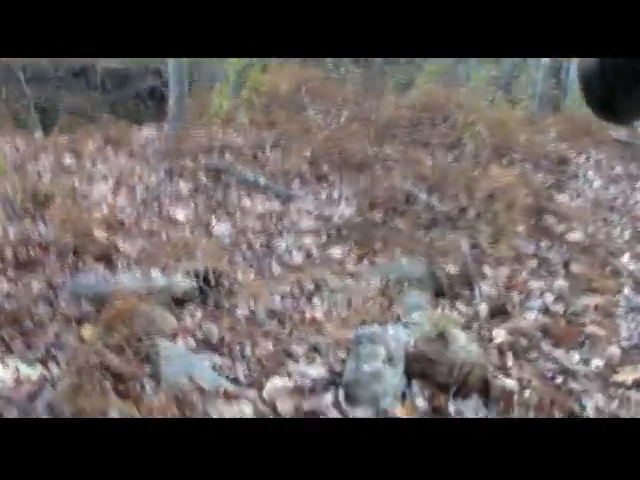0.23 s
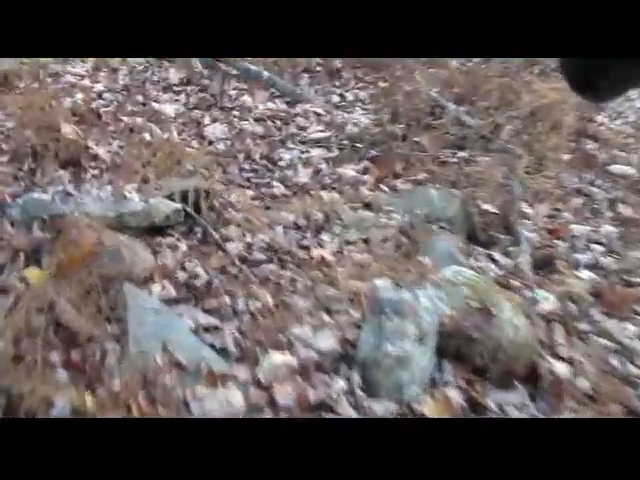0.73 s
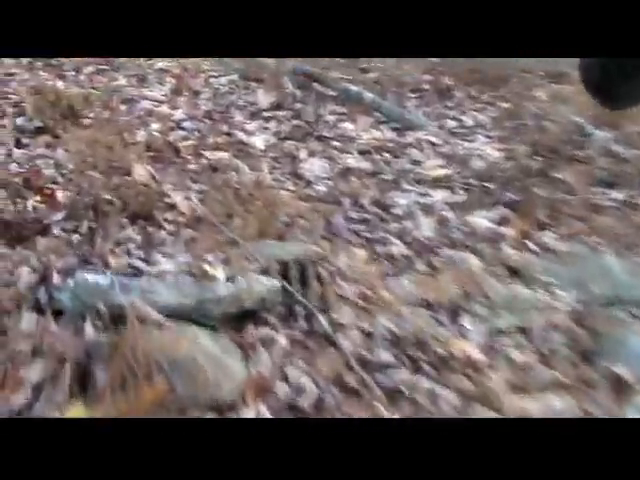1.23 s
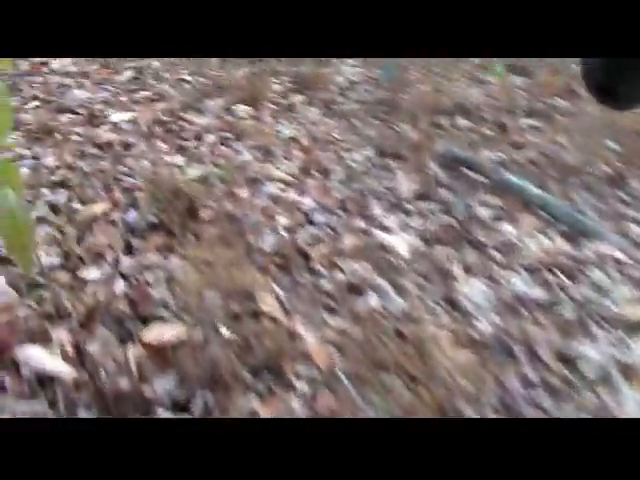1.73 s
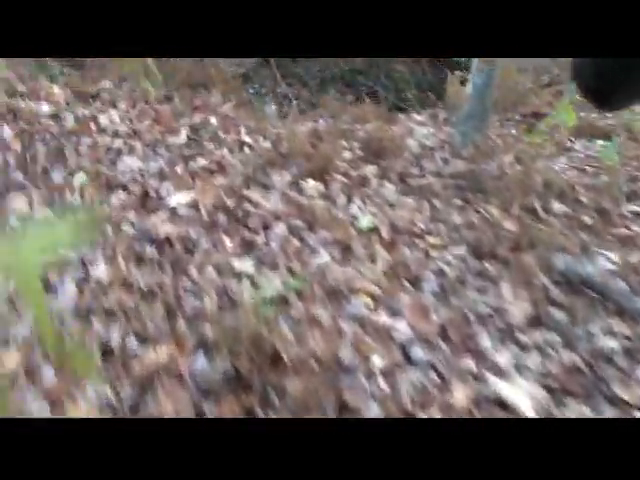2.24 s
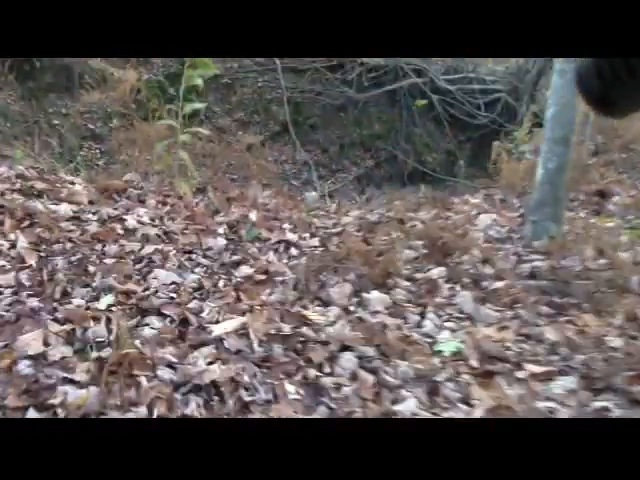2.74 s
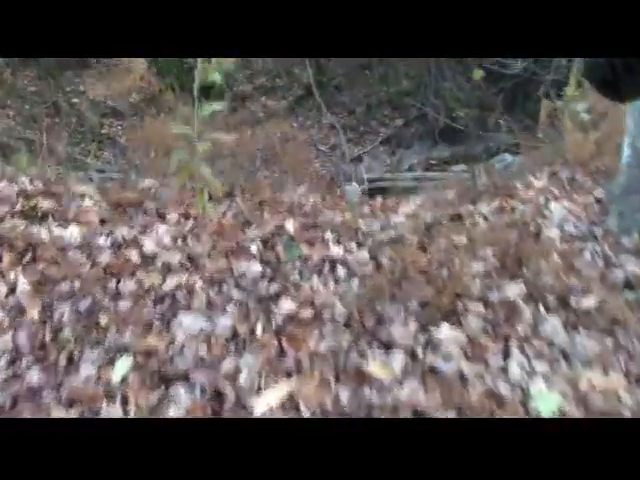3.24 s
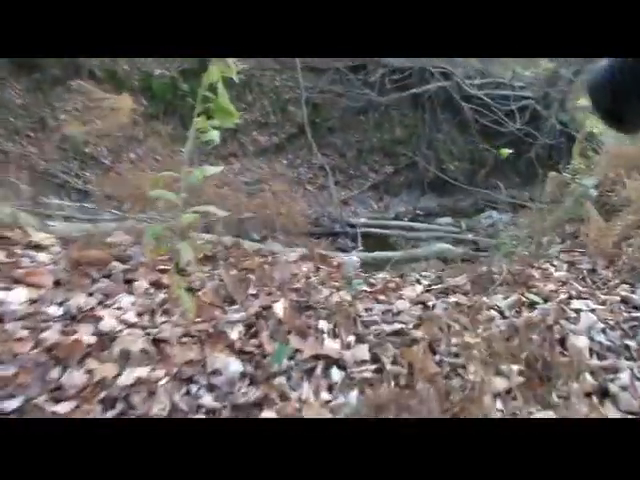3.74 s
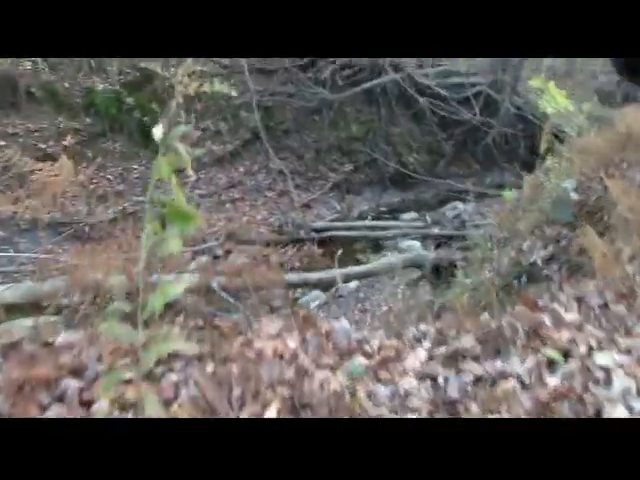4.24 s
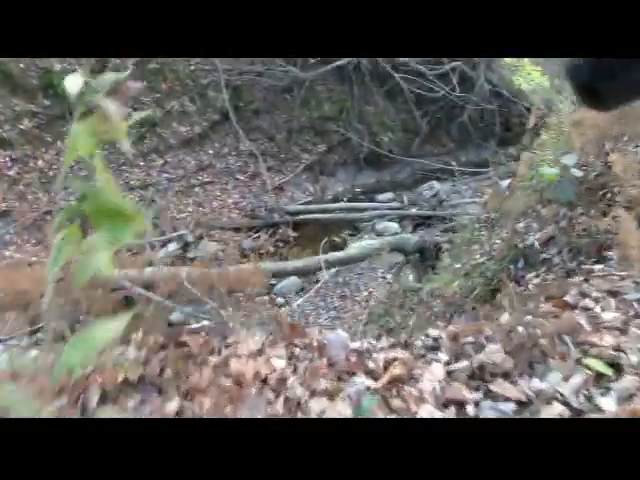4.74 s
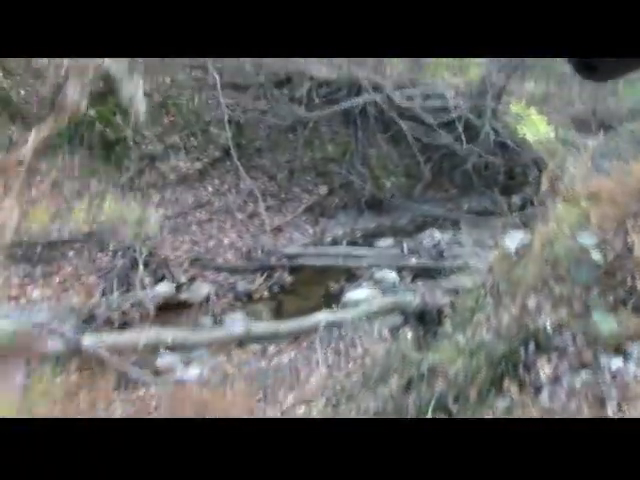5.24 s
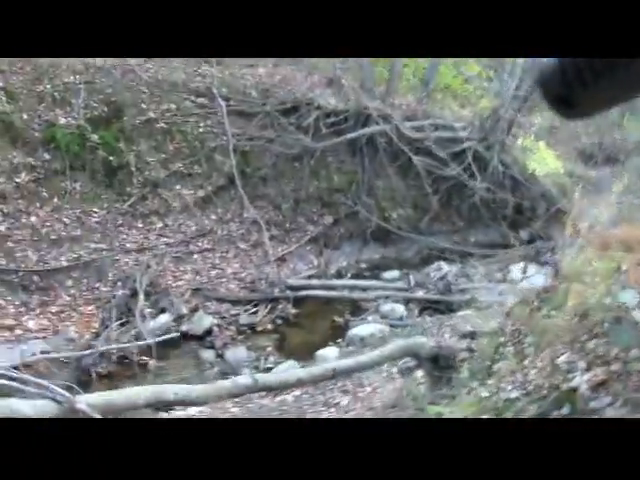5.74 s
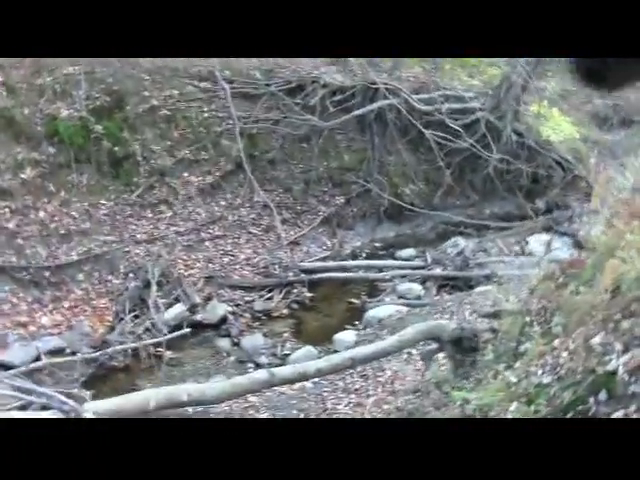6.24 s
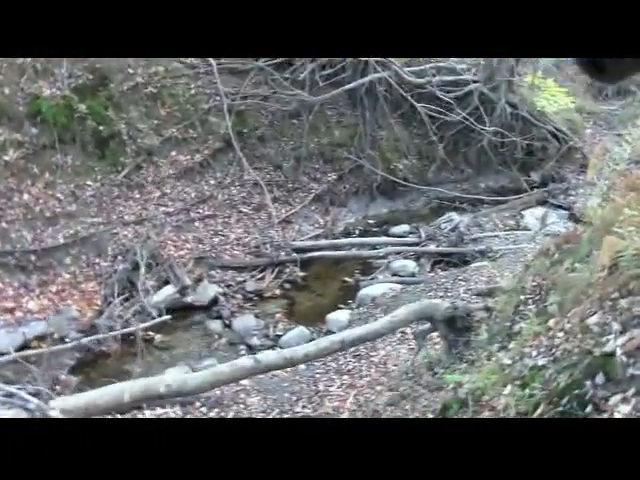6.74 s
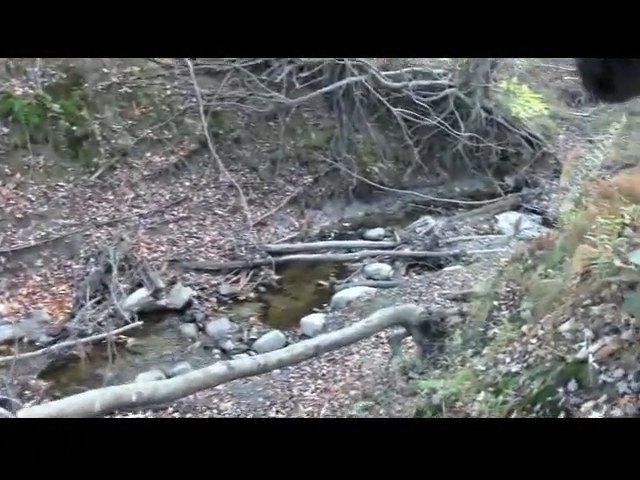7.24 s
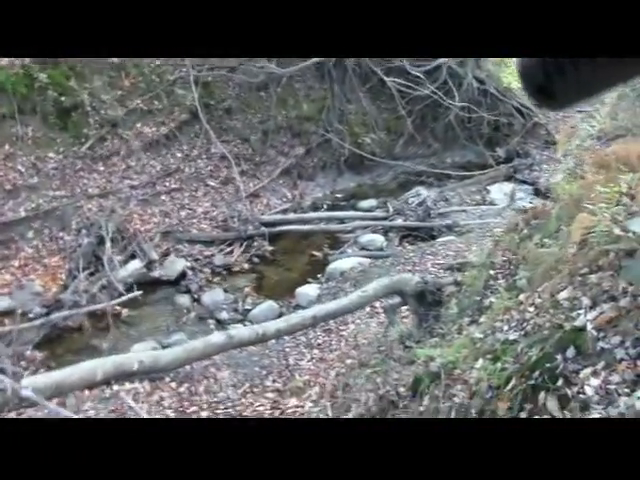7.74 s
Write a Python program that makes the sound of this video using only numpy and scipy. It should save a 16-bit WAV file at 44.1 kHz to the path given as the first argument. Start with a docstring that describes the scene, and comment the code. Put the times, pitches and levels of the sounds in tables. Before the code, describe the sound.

Someone walks unhurriedly through thick dry leaf litter, each step a dense crackling crunch, then stops, leaving faint water wash and small leaf ticks.

```python
"""A dry tick and a brush of leaves, then slow steps through deep dry litter on a creek bank until walking stops.
Each foot crushes the leaves: a dense random shower of short fractures, shaped by pressure and coloured by filters.
Bent leaves flick back as sparse bright ticks, stems snap singly, and decaying sines make a few soft knocks.
A thin tail of decaying noise answers from the wood, and filtered noise makes the creek's wash.
Apart from the creek, four sines make a faint steady hum."""
import sys
import numpy as np
from scipy import signal
from scipy.fft import rfft, irfft
from scipy.io import wavfile
from scipy.ndimage import uniform_filter1d

SR = 44100
rng = np.random.default_rng(int(sys.argv[2]) if len(sys.argv) > 2 else 0)


def materialize(psi):
    """Save the field psi as 16-bit PCM at rate SR to the path in sys.argv[1].

    A 1-D psi becomes a single channel; in a 2-D psi each row is a channel.
    """
    bounded = np.clip(np.atleast_2d(psi).T, -1, 1)
    quanta = np.round(bounded * 32767).astype(np.int16)
    wavfile.write(sys.argv[1], SR, quanta)


N = 352359
TIME = np.arange(N) / SR

# Colour of cracking leaves: f/Hz, relative spectral level/dB per Hz
LEAF = [(30, -43), (150, -42.5), (250, -28.5), (480, -13), (1200, -6), (2000, -5), (2900, -2), (3900, -5.5),
        (5600, 0.5), (8000, -7), (9600, -5.5), (11300, -11.5), (14000, -14), (15700, -22.5)]
# Footfalls, left foot first: t at full weight/s, rise/(dB/s), hold/s, relative level/dB, fade/(dB/s),
# time from full weight until the foot lifts/s, hollow body offset/dB, crisp edge offset/dB
STEPS = [(0.241, 128, 0.062, -14, 68, 0.39, -0.6, -.5), (0.994, 300, 0.22, -16, 89, 0.45, 0.5, -0.4),
         (1.756, 301, 0.059, -14.5, 53, 0.7, -4.5, -2), (2.633, 286, 0.19, -18.5, 64, .52, -0.5, -2.5),
         (3.486, 181.5, 0.23, -18, 49.5, 0.76, -1, 0), (4.401, 479, 0.34, -17, 84, 0.6, -0.5, -3),
         (5.281, 270, 0.2, -17, 66.5, 0.56, -3, -0.5), (6.133, 427, 0.037, -16.5, 32.5, 0.5, 0, -1.5),
         (6.846, 90, 0.066, -15.5, 347.5, 0.097, -1.5, 1)]
SWING_S = 0.196  # a foot takes over this long before it bears full weight


def gain_of(db):
    """Level definition: decibels to amplitude ratio."""
    return 10 ** (np.asarray(db) / 20)


def evened(x):
    """Power normalisation: scales to rms 1."""
    return x / np.sqrt(np.mean(x ** 2) + 1e-20)


def read(points, hz):
    """Interpolation of a spectrum table by straight lines on a logarithmic frequency axis."""
    f, value = np.transpose(points)
    return np.interp(np.log(hz + 1), np.log(f + 1), value)


def add(mix, s, sound):
    """Superposition: mixes a stereo sound in at time s."""
    part = mix[:, max(round(s * SR), 0):][:, :sound.shape[1]]
    part += sound[:, :part.shape[1]]


def wander(corner_hz):
    """Low-passed noise: a slow random fluctuation of rms 1."""
    rolloff = 1 + (np.fft.rfftfreq(N, 1 / SR) / corner_hz) ** 2
    return evened(irfft(rfft(rng.standard_normal(N)) / rolloff, N))


def patches(shape, bins, frames):
    """Twice-smoothed noise: a random field of rms 1 over frequency bins and time frames."""
    field = rng.standard_normal(shape)
    for _ in range(2):
        field = uniform_filter1d(field, bins, axis=0)
        field = uniform_filter1d(field, frames, axis=1)
    return evened(field)


def coloured(x, spectrum, size=4096):
    """Minimum-phase filtering: a causal response of unit energy, so that cracks keep their sharp fronts."""
    log_gain = np.log(gain_of(read(spectrum, abs(np.fft.fftfreq(size, 1 / SR)))))
    # the Hilbert transform of the log gain gives the minimum phase
    response = np.exp(np.conj(signal.hilbert(log_gain)))
    taps = np.fft.ifft(response).real[:size // 2]
    return signal.oaconvolve(x, taps[None] / np.linalg.norm(taps), axes=1)[:, :x.shape[1]]


def leaves(crush_db, cracks_per_s=15000, rate_follow=.55, clump_db=1.5, level_db=0.75):
    """Granular fracture: more pressure breaks more leaves at once, and they give way in clumps."""
    toe_thinning_db = -5  # under the toe the cracks are fewer and each is larger
    swing, roll = stride()
    rate_db = rate_follow * (crush_db - crush_db.max()) + toe_thinning_db * roll
    per_s = np.minimum(cracks_per_s * gain_of(rate_db), SR)
    cracks = shower(per_s, spread_db=2.5, limit_db=17)
    cracks = cracks * gain_of(crush_db + clump_db * wander(corner_hz=14))
    body_db, edge_db = underfoot(crush_db, swing, roll)
    return gain_of(level_db) * litter_colour(coloured(cracks, LEAF), body_db, edge_db)


def crush():
    """Contact pressure as summed power in dB: steps rise, hold, fade and lift off; scuffs swell and pass."""
    # Shorter scuffs, as a toe catches, a sole rolls or a heel lifts: t/s, half length/s, relative level/dB
    scuffs = [(0.01, 0.022, -40), (0.13, 0.015, -35), (0.525, 0.038, -26.5), (0.697, 0.031, -31),
              (0.842, 0.069, -37.5), (0.906, 0.0089, -18.5), (0.922, 0.01, -27.5), (1.41, 0.027, -30.5),
              (1.66, 0.039, -31.5), (1.999, 0.033, -18.5), (2.259, 0.048, -26), (2.589, 0.0061, -21),
              (3.377, .035, -34), (3.765, 0.029, -19.5), (3.966, 0.066, -30), (4.321, 0.014, -37),
              (4.698, 0.011, -17.5), (5.177, 0.038, -39), (5.753, 0.057, -28.5), (5.905, 0.082, -34.5),
              (6.05, 0.016, -51), (6.53, .04, -27.5), (6.998, .018, -24.5), (6.7, 0.054, -28),
              (7.073, .13, -30), (7.274, 0.078, -42)]
    rest_db = -49  # the litter never lies quite still
    sag_db_per_s = 7  # the crunch eases while the foot stands on it
    lift_db_per_s = 212  # added to the fade once the foot lifts
    power = gain_of(rest_db) ** 2
    for s, rise, hold, db, fade, lift, _, _ in STEPS:
        t = TIME - s
        pressed = db + rise * np.minimum(t, 0) - sag_db_per_s * np.clip(t, 0, hold)
        eased = fade * np.maximum(t - hold, 0) + lift_db_per_s * np.maximum(t - lift, 0)
        power = power + gain_of(np.maximum(pressed - eased, -120)) ** 2
    for s, half, db in scuffs:
        swell = np.exp(-np.minimum(((TIME - s) / half) ** 2, 20))
        power = power + gain_of(db) ** 2 * swell
    return 10 * np.log10(power)


def current_step():
    """Gait timing: which footfall is under way at every sample."""
    return np.searchsorted(np.array(STEPS)[1:, 0] - SWING_S, TIME)


def stride():
    """Gait phase: swing falls from 1 to 0 as the foot comes down, then roll goes from 0 (heel) to 1 (toe)."""
    roll_s = .25  # the sole rolls from heel to toe in this time
    t = TIME - np.array(STEPS)[current_step(), 0]
    return np.clip(-t / SWING_S, 0, 1), np.clip(t / roll_s, 0, 1)


def underfoot(crush_db, swing, roll, sink_db=1.5):
    """Spectral balance under load: fuller and crisper toward the toe, hollow as the pressure eases; in dB."""
    # under light pressure the leaves bend more than they break: hollow, with less edge
    soft_below_db, hollow_per_db, dull_per_db = -29, .5, 0.13
    # the heel crunches duller than the toe; a foot in the air only brushes the crisp top leaves
    heel_edge_db, toe_edge_db, swing_edge_db = 0.5, 2, 2
    *_, body_db, edge_db = np.array(STEPS)[current_step()].T
    soft_db = np.maximum(soft_below_db - crush_db, 0)
    sole_db = heel_edge_db * (1 - swing - roll) + swing_edge_db * swing + toe_edge_db * roll
    body_db = body_db + sink_db * roll + hollow_per_db * soft_db
    return body_db, edge_db + sole_db - dull_per_db * soft_db


def crack(hz, ring_s, tear_s, ring, scatter, scatter_s, size=1024):
    """Impulsive fracture: a brief tear, a few cycles of the blade, and scatter off the leaves around it."""
    t = np.arange(size) / SR
    tear = np.exp(-t / tear_s) * rng.standard_normal(size)
    blade = np.exp(-t / ring_s) * np.sin(2 * np.pi * hz * t) * rng.choice([-1, 1])
    around = np.exp(-t / scatter_s) * rng.standard_normal(size)
    return evened(evened(tear) + ring * evened(blade) + scatter * evened(around))


def shower(per_s, spread_db, limit_db, count=48):
    """Random shot noise: cracks of many pitches and sizes at a given rate, with even mean power."""
    at = np.flatnonzero(rng.random(N) < per_s / SR)
    sizes = gain_of(np.minimum(spread_db * rng.exponential(1, N), limit_db))
    # rarer cracks are larger, which keeps the mean power even
    sizes = evened(sizes)[at] * np.sqrt(SR / per_s[at])
    kinds = rng.integers(0, count, N)[at]
    out, power = np.zeros((2, N)), 0
    for k, hz in enumerate(np.geomspace(1200, 14000, count)):
        pair = np.array([crack(hz, ring_s=0.0011, tear_s=0.00057, ring=0.5, scatter=0.79, scatter_s=0.0033)
                         for _ in out])
        impulses = np.bincount(at[kinds == k], sizes[kinds == k], N)
        out += signal.oaconvolve(impulses[None], pair, axes=1)[:, :N]
        power = power + abs(rfft(pair)) ** 2
    # taken together the cracks favour no pitch; the leaf colour is laid on afterwards
    flatten = np.fft.fftshift(irfft(power ** -.5), axes=1)
    return evened(signal.oaconvolve(out, flatten, "same", axes=1))


def litter_colour(x, body_db, edge_db, body_hz=680, body_octaves=0.89, edge_hz=7800,
                  drift_db=0.5, flutter_db=1.5, size=512):
    """Time-varying filtering: hollow body, crisp edge, and brief pitches favoured by each crumpling leaf."""
    hz, t, z = signal.stft(x, SR, nperseg=size, noverlap=3 * size // 4)
    body = np.exp(-.5 * (np.log2((hz + 1) / body_hz) / body_octaves) ** 2)
    edge = 1 - 1 / (1 + (hz / edge_hz) ** 8)
    db = np.outer(body, np.interp(t, TIME, body_db)) + np.outer(edge, np.interp(t, TIME, edge_db))
    drift = drift_db * patches(db.shape, bins=14, frames=28)
    flutter = flutter_db * patches(db.shape, bins=3, frames=6)
    z = z * gain_of(db) * evened(gain_of(drift + flutter))
    return signal.istft(z, SR, nperseg=size, noverlap=3 * size // 4)[1][:, :N]


def settling(crush_db, ticks_per_s=110, follow_crush=0.57, level_db=-21.5, bright_hz=3000):
    """Elastic recovery: bent leaves flick back in small bright ticks that stand out between the steps."""
    ticks = shower(np.full(N, ticks_per_s), spread_db=10.0, limit_db=16, count=12)
    high_pass = signal.butter(1, bright_hz, "high", fs=SR)
    ticks = signal.lfilter(*high_pass, coloured(ticks, LEAF))
    return evened(ticks) * gain_of(level_db + follow_crush * crush_db)


def snaps(level_db=0.5, delay_s=0.000986):
    """Brittle fracture: stiffer stems break with one sharp, dry tick each."""
    # The loudest stems and leaf ribs that snap singly: t before delay_s/s, relative peak level/dB, f/Hz
    stem_snaps = [(0.0176, -13, 5960), (0.0968, -16.5, 5270), (0.595, -9.5, 5700), (0.6398, -13.5, 3810),
                  (0.8998, -8, 5400), (0.9022, -6, 5500), (1.4056, -14, 5670), (1.587, -22, 9400),
                  (1.641, -4.5, 6900), (1.6948, -12.5, 5140), (1.9514, -13, 5310), (2.163, -10, 3930),
                  (2.587, -7, 2750), (2.847, -1.5, 5500), (2.889, -4, 5530), (3.2162, -13, 7100),
                  (3.254, -15.5, 5800), (3.895, -8, 5050), (4.0986, -12.5, 4440), (4.265, -22, 4500),
                  (4.311, -21, 5000), (4.38, -11, 4900), (4.89, -12.5, 4500), (4.9584, -13.5, 2320),
                  (5.0537, -11.5, 5700), (5.2018, -16, 6140), (5.235, -7, 5560), (5.344, -13, 5300),
                  (5.6925, -13, 3000), (6.2987, -2.5, 5560), (6.326, -4, 6300), (6.334, -5, 2540),
                  (6.3916, -4, 5700), (6.6244, -1.5, 4800), (7.097, -11, 6400), (7.2717, -15.5, 6600),
                  (7.4175, -19.5, 4800), (7.57, -17.5, 3470), (7.6121, -18, 5060), (7.676, -22, 5950),
                  (7.871, -18.5, 2800), (7.9123, -22, 5060)]
    # Colour of a snapping stem, broader than that of the leaves: f/Hz, relative spectral level/dB per Hz
    stem_colour = [(30, -63), (200, -38), (500, -9), (1200, -5.5), (2900, -9), (4000, -6.5), (5600, -3.5),
                   (8000, -6), (9600, -5), (15700, -18)]
    out = np.zeros((2, N))
    for s, db, hz in stem_snaps:
        pair = [crack(hz, ring_s=0.001, tear_s=0.0011, ring=0.56, scatter=0.29, scatter_s=0.0033)
                for _ in out]
        tick = coloured(np.array(pair), stem_colour)
        tick = tick / abs(tick).max(1, keepdims=True)
        add(out, s + delay_s, gain_of(db + level_db) * tick)
    return out


def knocks(swell_s=0.00098, level_db=-1, low_cut_hz=240, size=1024):
    """Heavily damped resonance: dull bumps that die within a few cycles."""
    # Soft low knocks between the steps: t/s, relative envelope peak level/dB, f/Hz
    soft_knocks = [(0.641, -27, 540), (0.722, -14.5, 534), (0.807, -25.5, 585), (3.136, -33, 715),
                   (3.287, -30, 463)]
    out, t = np.zeros((2, N)), np.arange(size) / SR
    envelope = t / swell_s * np.exp(1 - t / swell_s)
    for s, db, hz in soft_knocks:
        bump = envelope * np.sin(2 * np.pi * hz * t)
        add(out, s, gain_of(db + level_db) * np.array([bump, bump]))
    return signal.lfilter(*signal.butter(2, low_cut_hz, "high", fs=SR), out)


def ports(shared, stray, path, stray_db=0):
    """Spatial coherence: two close microphones hear the same bass but part ways in the treble."""
    # Sound that reaches the ports from all sides, before stray_db: f/Hz, level re direct sound/dB
    stray_level = [(40, -7), (130, -16), (300, -20.5), (1000, -20), (2100, -16.5), (3000, -14.5),
                   (4400, -10), (5600, -33), (8300, -7.5), (9700, -11.5), (15000, -5)]
    hz, path = np.fft.rfftfreq(N, 1 / SR), np.array(path)
    apart = gain_of(read(stray_level, hz) + stray_db)
    direct, around = rfft(shared), apart * rfft(stray)
    # each port takes half of the phase lead and half of the level difference
    phase = np.exp(.5j * read(path[:, [0, 1]], hz))
    lean = phase * gain_of(read(path[:, [0, 2]], hz) / 2)
    pair = np.array([(direct + around) * lean, (direct - around) / lean])
    return irfft(pair / np.sqrt(1 + apart ** 2), N)


def feet(cracks, order=2001):
    """Phase and level differences place the two feet, which take turns by an equal-power crossfade."""
    # How each foot reaches the two ports: f/Hz, phase lead of left/rad, level left minus right/dB
    left_path = [(400, 0.077, -0.5), (1900, 0.4, 1.5), (2960, 0.23, 2), (4230, 0.87, 3.5), (5400, 0.51, 1),
                 (7650, 1.16, 0.5), (8700, 0.97, 3.5), (10500, 1.64, -2), (13300, 2.2, 4), (15800, 1.6, 1)]
    right_path = [(400, 0.049, -0.5), (2000, 0.067, 1), (4570, 0.045, 0), (7340, 0.96, -0.1),
                  (8950, 0.23, 4.5), (11100, 1, -2), (13100, .65, 6), (15800, 0.71, -9)]
    side = uniform_filter1d(current_step() % 2 * np.pi / 2, order)
    left = ports(*(cracks * np.cos(side)), left_path)
    return left + ports(*(cracks * np.sin(side)), right_path)


def wood(x, t60=0.56, wet_db=-22, dull_hz=5000):
    """Exponential reverberant decay: trunks and the far bank send back a thin, dull tail."""
    t = np.arange(SR // 2) / SR
    decay = gain_of(-60 * t / t60) * (t > .008)  # the tail starts after 8 ms
    taps = rng.standard_normal((2, len(t))) * decay
    taps = signal.lfilter(*signal.butter(1, dull_hz, fs=SR), taps)
    return gain_of(wet_db) * signal.oaconvolve(x, taps / np.linalg.norm(taps[0]), axes=1)[:, :N]


def background(wash_db=-47, waver_db=0.7, stray_db=7):
    """Broadband noise for the creek's wash, from ahead and all around; steady sines for a separate faint hum."""
    # The creek and the wood around it: f/Hz, relative spectral level/dB per Hz
    creek_colour = [(30, -28), (100, -19.5), (170, -12.5), (260, -6), (450, 2), (750, 7.5), (1200, -1.5),
                    (2000, -5), (3000, -3.5), (4200, -11), (5600, -15), (9500, -19), (15000, -35)]
    # A faint steady hum, not part of the creek: f/Hz, rms level/dB
    hum_tones = [(258.4, -71.5), (387.6, -72), (452.2, -70), (516.8, -64)]
    ahead = [(0, 0, 0)]  # no phase or level difference at any frequency
    wash = coloured(ports(*rng.standard_normal((2, N)), ahead, stray_db), creek_colour)
    hum = sum(gain_of(db) * np.sqrt(2) * np.sin(2 * np.pi * (hz * TIME + rng.random()))
              for hz, db in hum_tones)
    return wash * gain_of(wash_db + waver_db * wander(corner_hz=13.0)) + hum


def scene():
    """Superposition of the steps close by, their echo, and the background of creek and hum."""
    crush_db = crush()
    steps = feet(leaves(crush_db) + settling(crush_db) + snaps()) + knocks()
    return steps + wood(steps) + background()


def record(dry, edge_hz=15900):
    """Soft saturation and band limiting: the loudest peaks are rounded off, then the top treble is cut."""
    rounded = dry / (1 + dry ** 8) ** (1 / 8)
    low_pass = signal.firwin(401, edge_hz, window=("kaiser", 8), fs=SR)
    return signal.oaconvolve(rounded, low_pass[None], "same")


dry = scene()
out = record(dry)
materialize(out)
```